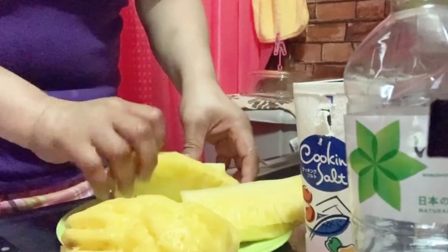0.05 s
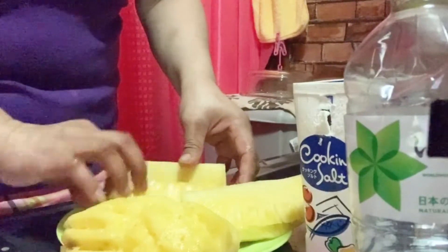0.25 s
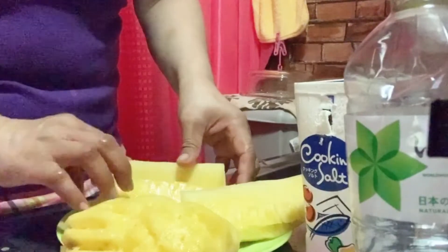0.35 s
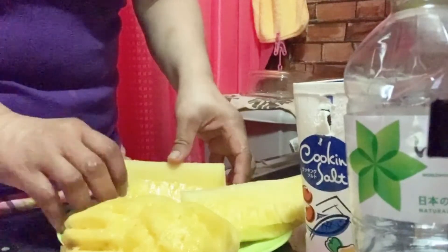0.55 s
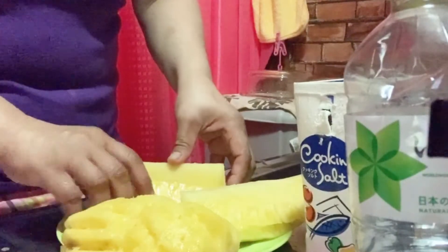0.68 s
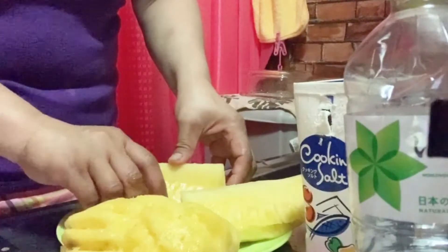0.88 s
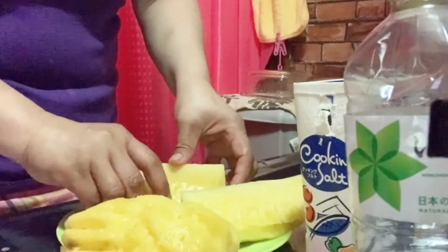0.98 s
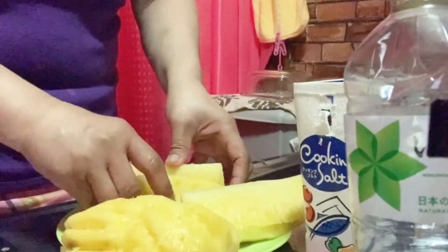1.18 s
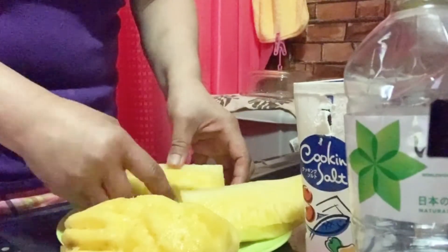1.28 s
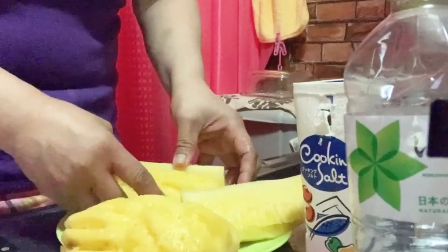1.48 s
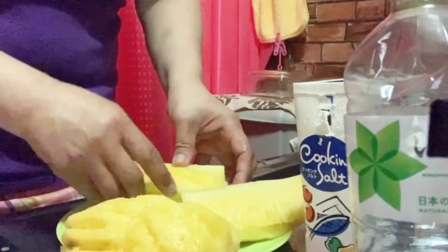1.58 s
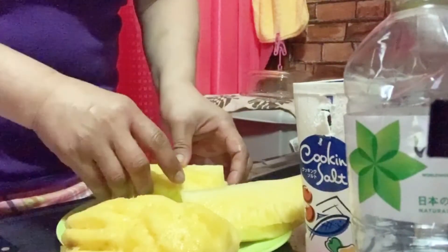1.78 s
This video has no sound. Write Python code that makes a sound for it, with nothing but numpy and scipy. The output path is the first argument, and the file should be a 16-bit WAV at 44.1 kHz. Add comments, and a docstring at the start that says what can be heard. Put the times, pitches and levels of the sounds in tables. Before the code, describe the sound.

Juicy fruit flops onto a plate, then squelches softly as fingers move it.

```python
"""Over a low room hum comes a faint wet tick and a nudge of the table: pineapple handled on a plate, close up.
One piece peels loose and flops down with a double slap that rings the dishes and shakes the table.
Fingers then grip and slide the fruit with small squelches, wet ticks, soft bumps, a squirt and a gurgle.
Slaps and ticks are noise bursts, squelches are clouds of clicks, dishes and table are decaying sines."""
import sys
import numpy as np
from scipy import signal
from scipy.fft import rfft, irfft
from scipy.io import wavfile

SR = 44100
rng = np.random.default_rng(int(sys.argv[2]) if len(sys.argv) > 2 else 0)


def file_out(sig):
    """Save sig as 16-bit WAV at sys.argv[1]."""
    # one column per channel
    cols = np.atleast_2d(sig).T
    # limit, then scale
    lim = np.clip(cols, -1, 1)
    pcm = np.round(lim * 32767).astype(np.int16)
    wavfile.write(sys.argv[1], SR, pcm)


N = 81585


def amp(db):
    """Decibels to gain."""
    return 10 ** (np.asarray(db) / 20)


def unit(x):
    """Scales to rms 1."""
    return x / np.sqrt(np.mean(x ** 2) + 1e-20)


def curve_at(points, hz):
    """Reads a curve on a log-frequency axis."""
    f, value = np.transpose(points)
    return np.interp(np.log(hz + 1), np.log(f + 1), value)


def add(mix, start, sound):
    """Mixes a sound in at a start time in seconds."""
    part = mix[max(round(start * SR), 0):][:len(sound)]
    part += sound[:len(part)]


def eq(x, points, tilt_db=0, tilt_from_hz=2200, size=8192):
    """Minimum-phase EQ of unit power, with a treble tilt in dB per octave."""
    hz = np.fft.rfftfreq(size, 1 / SR)
    gain = amp(curve_at(points, hz) + tilt_db * np.log2(np.maximum(hz / tilt_from_hz, 1)))
    log_gain = np.log(np.r_[gain, gain[-2:0:-1]])
    taps = np.fft.ifft(np.exp(np.conj(signal.hilbert(log_gain)))).real[:size // 2]
    return signal.fftconvolve(x, taps / np.linalg.norm(taps))


def ring(t, attack, t60):
    """Envelope: a smooth attack, then a fall of 60 dB in t60 seconds."""
    rise = np.sin(np.pi / 2 * np.minimum(t / attack, 1)) ** 2
    return rise * np.exp(-np.log(1000) * np.maximum(t - attack, 0) / t60)


def splat(decay_s, attack_s=0.00022):
    """A sharp burst of noise that dies at once."""
    t = np.arange(SR // 8) / SR
    envelope = np.minimum(t / attack_s, 1) * np.exp(-t / decay_s)
    return unit(envelope * rng.standard_normal(len(t))) * np.sqrt(np.mean(envelope ** 2))


def wet_clicks(attack, release, clicks_per_s=5000, spread_db=4.5):
    """A cloud of tiny clicks that swells and fades."""
    t = np.arange(SR // 2) / SR
    sizes = amp(spread_db * np.minimum(rng.exponential(1, len(t)), 4)) * rng.choice([-1, 1], len(t))
    clicks = unit(sizes * (rng.random(len(t)) < clicks_per_s / SR))
    return clicks * np.minimum(t / attack, 1) * np.exp(-2 * (np.maximum(t - attack, 0) / release) ** 2)


# Dark room tone. Each row: frequency in Hz, gain in dB.
HUM_EQ = [(20, -6), (52, 4), (85, -7.5), (135, 1), (170, -7), (240, -2.5), (305, -2.5), (360, -5.5),
          (460, -13), (610, -10), (760, -18.5), (1100, -19), (1450, -22), (2200, -26), (3800, -31.5),
          (6000, -37), (10000, -43), (16000, -49)]
# Its resonances. Each row: centre in Hz, width in Hz, boost in dB.
HUM_PEAKS = [(213, 9.6, 7), (266.8, 23, 7), (309.8, 19.3, 8), (559, 16, 2.5), (604.5, 16.6, 7),
             (657, 25, 7), (1440, 53, 11), (1642, 15.4, 15.5), (4000, 24, 13)]
def room_hum(level_db=-50.5):
    """A steady bed of low noise with a few narrow peaks."""
    f = np.fft.rfftfreq(N, 1 / SR)
    peaks_db = sum(db / (1 + (2 * (f - hz) / width) ** 2) for hz, width, db in HUM_PEAKS)
    spectrum = rfft(rng.standard_normal(N)) * amp(curve_at(HUM_EQ, f) + peaks_db)
    return amp(level_db) * unit(irfft(spectrum, N))


# Wet ticks. Each row: start in seconds, level in dB, treble tilt in dB per octave.
TICKS = [(0.038, -54.5, 4), (.1993, -36, 7), (0.5063, -49, -9), (0.593, -46.5, -4.5), (0.5981, -38, 0.5),
         (0.707, -49.5, -3), (.7395, -47, 6), (0.8034, -43, 3.5), (0.9536, -45, -2.5),
         (1.0626, -48.5, -2.5), (1.186, -49, -16), (1.2205, -38.5, -17), (1.2372, -56, -8),
         (1.28, -47.5, 10.5), (1.303, -35.5, 4.5), (1.3215, -48, 2), (1.4218, -56, 0)]
# Their midrange snap. Each row: frequency in Hz, gain in dB.
TICK_EQ = [(200, -7), (700, -9.5), (1350, 10), (2200, 0), (4000, -5), (8000, -26), (16000, -37)]
def juice_ticks():
    """Single films of juice snap."""
    out = np.zeros(N)
    for start, db, tilt_db in TICKS:
        add(out, start, amp(db) * eq(splat(decay_s=0.0028), TICK_EQ, tilt_db))
    return out


# Pushes on the table. Each row: start in seconds, attack in seconds, level in dB.
PUSHES = [(0.055, 0.04, -33.5), (.213, 0.031, -23), (0.358, 0.038, -30.5), (0.476, 0.024, -57),
          (0.609, 0.037, -48.5), (0.699, 0.089, -31.5), (0.938, 0.032, -42.5), (1.04, 0.011, -44.5),
          (1.278, 0.053, -31.5), (1.669, 0.027, -50)]
def table_sway(hz=51.34, t60=0.52):
    """Each push sets the table swaying on one deep note."""
    out, t = np.zeros(N), np.arange(SR) / SR
    for start, attack, db in PUSHES:
        add(out, start, amp(db) * ring(t, attack, t60) * np.sin(2 * np.pi * hz * t))
    return out


# Peels and slides. Each row: start, attack and release in seconds, level in dB, tilt in dB per octave.
SQUELCHES = [(0.2, 0.0068, 0.018, -38.5, 4), (0.595, 0.0066, 0.0086, -53.5, -7),
             (0.721, 0.014, 0.069, -58, 0.5), (0.805, 0.0021, 0.024, -54.5, -5),
             (1.079, .03, 0.18, -61.5, -2), (1.155, 0.062, 0.14, -56, 0), (1.28, 0.0027, 0.011, -51.5, 3),
             (1.306, 0.0027, 0.033, -49.5, -1.5), (1.581, 0.093, 0.045, -60.5, -9),
             (1.746, 0.029, 0.034, -53, -6.5)]
# Their fleshy tone. Each row: frequency in Hz, gain in dB.
SQUELCH_EQ = [(200, 10.5), (700, -4.5), (1200, 2.5), (2100, 0.5), (3000, -2), (5500, -7.5), (10000, -12.5),
              (16000, -20)]
def squelches():
    """Wet flesh crackles as it peels or slides."""
    out = np.zeros(N)
    for start, attack, release, db, tilt_db in SQUELCHES:
        add(out, start, amp(db) * eq(wet_clicks(attack, release), SQUELCH_EQ, tilt_db))
    return out


# Soft bumps. Each row: start and attack in seconds, boom pitch in Hz, boom and thud levels in dB.
BUMPS = [(0.2161, 0.018, 127.6, -24, -35.5), (0.2452, 0.016, 128, -18, -31),
         (.607, 0.027, 128, -37.5, -40.5), (.692, 0.0066, 239, -43.5, -53.5),
         (.812, 0.011, 130.4, -38, -43), (0.958, 0.037, 132.4, -45, -48), (1.277, 0.029, 181.4, -41, -43),
         (1.3278, .01, 123.4, -24.5, -44), (1.412, 0.011, 116.3, -38.5, -59)]
# The muffled thud. Each row: frequency in Hz, gain in dB.
THUD_EQ = [(30, -24), (90, 3.5), (200, 5), (320, 4.5), (600, -10), (1000, -21), (3000, -57)]
def bumps():
    """Fruit bumps the plate: a pitched boom under a dull thud of noise."""
    out, t = np.zeros(N), np.arange(SR) / SR
    for start, attack, hz, boom_db, thud_db in BUMPS:
        boom = ring(t, attack, t60=0.22) * np.sin(2 * np.pi * hz * t)
        thud = ring(t, attack / 2, t60=0.23) * unit(eq(rng.standard_normal(SR), THUD_EQ)[:SR])
        add(out, start, amp(boom_db) * boom + amp(thud_db) * thud)
    return out


# The piece lands. Each row: start in seconds, level in dB, decay in seconds.
SLAPS = [(.2432, -27.5, 0.0093), (.2698, -27, 0.011), (.2885, -31, 0.013), (.3095, -40, 0.007)]
# A fat smack with a soft top. Each row: frequency in Hz, gain in dB.
SLAP_EQ = [(150, 8.5), (450, -2), (750, -2), (1300, -0.5), (2100, -1.5), (4000, -8.5), (8000, -14),
           (12000, -19), (16000, -25)]
def slaps():
    """Wet flesh smacks onto the plate."""
    out = np.zeros(N)
    for start, db, decay in SLAPS:
        add(out, start, amp(db) * eq(splat(decay), SLAP_EQ))
    return out


# Modes of the dishes and table. Each row: pitch in Hz, level in dB, t60 in seconds.
DISH_MODES = [(242.2, -29, 0.2), (261, -31, 0.195), (300.3, -32.5, 0.286), (396, -40.5, .25),
              (510, -39, 0.38), (560.4, -36.5, 0.3), (608, -39, 0.51), (666, -41, 0.29), (1218, -45, 0.12),
              (1804, -47.5, 0.32), (2009, -35.5, 0.19), (2876, -38.5, 0.18)]
def dishes():
    """The hardest slap rings the dishes."""
    out, t = np.zeros(N), np.arange(SR) / SR
    start = max(SLAPS, key=lambda row: row[1])[0]
    for hz, db, t60 in DISH_MODES:
        add(out, start, amp(db) * ring(t, 0.001, t60) * np.sin(2 * np.pi * (hz * t + rng.random())))
    return out


# The table's bass modes. Each row: pitch in Hz, level in dB, t60 in seconds.
HEAVE_MODES = [(44.8, -26.5, 0.35), (76, -19.5, 0.11), (103, -23, .25)]
def table_heave(start_s=0.28, attack_s=0.0081):
    """The table heaves under the landing."""
    out, t = np.zeros(N), np.arange(SR) / SR
    for hz, db, t60 in HEAVE_MODES:
        add(out, start_s, amp(db) * ring(t, attack_s, t60) * np.sin(2 * np.pi * hz * t))
    return out


# One squirt. Each row: start in seconds, level in dB, decay in seconds.
SQUIRTS = [(.9575, -49.5, 0.0099)]
# Its bright fizz. Each row: frequency in Hz, gain in dB.
SQUIRT_EQ = [(1000, -10), (3500, -4.5), (6300, -6), (7500, 5.5), (9000, -8), (12000, -8), (15000, -5),
             (16000, -1.5)]
def squirt():
    """A thin jet of juice fizzes for an instant."""
    out = np.zeros(N)
    for start, db, decay in SQUIRTS:
        add(out, start, amp(db) * eq(splat(decay), SQUIRT_EQ))
    return out


# Two squeezes. Each row: start, attack and release in seconds, level in dB.
GURGLES = [(1.19, .03, 0.032, -53), (1.238, .014, 0.0086, -54)]
# Two vowel-like peaks. Each row: frequency in Hz, gain in dB.
GURGLE_EQ = [(400, -17), (850, -6), (1150, 7), (1450, -3), (1700, -12), (2050, 4), (2500, -23), (5000, -26)]
def gurgle():
    """Juice gurgles as it is squeezed between two pieces."""
    out = np.zeros(N)
    for start, attack, release, db in GURGLES:
        add(out, start, amp(db) * eq(wet_clicks(attack, release), GURGLE_EQ))
    return out


# Reverb time, longest in the bass. Each row: frequency in Hz, t60 in seconds.
ROOM_T60 = [(100, 0.9), (1000, 0.21), (4000, 0.15), (16000, 0.12)]
def kitchen(x, early_db=-9, early_decay_s=0.015, tail_db=-6):
    """Adds quick reflections off the table and jars, then a short tail."""
    t = np.arange(SR // 2) / SR
    early, late = rng.choice([-1., 1.], (2, len(t))) * (rng.random((2, len(t))) < 3000 / SR)
    early *= (t > .002) * np.exp(-t / early_decay_s)
    hz, times, bands = signal.stft(late * (t > .006), SR, nperseg=256)
    fade = np.exp(-np.log(1000) * times / curve_at(ROOM_T60, hz)[:, None])
    tail = signal.istft(bands * fade, SR, nperseg=256)[1][:len(t)]
    echoes = amp(early_db) * early / np.linalg.norm(early) + amp(tail_db) * tail / np.linalg.norm(tail)
    return x + signal.fftconvolve(x, echoes)[:N]


def scene():
    """Mono mix; only the juicy sounds feed the reverb."""
    juicy = slaps() + juice_ticks() + squirt() + squelches() + gurgle()
    return (kitchen(juicy) + dishes() + table_sway() + table_heave() + bumps() + room_hum())[None]


def record(dry, cutoff_hz=15900):
    """A steep low-pass trims the highest treble."""
    lowpass = signal.firwin(511, cutoff_hz, window=("kaiser", 9), fs=SR)
    return signal.oaconvolve(dry, lowpass[None], "same")


dry = scene()
out = record(dry)
file_out(out)
```